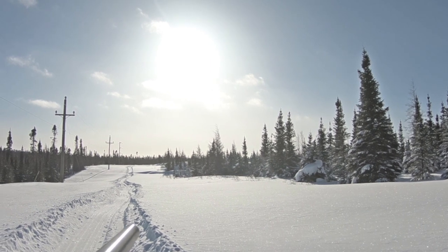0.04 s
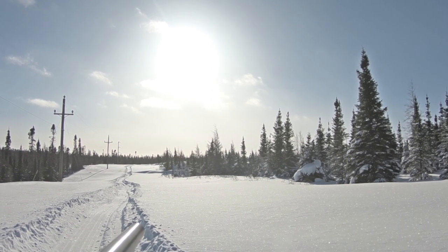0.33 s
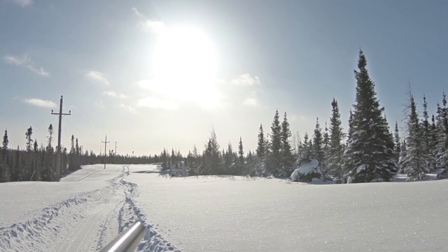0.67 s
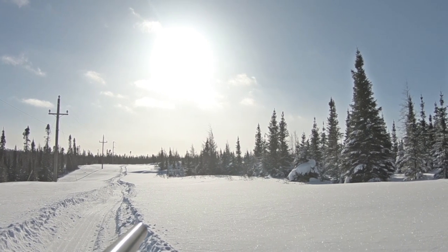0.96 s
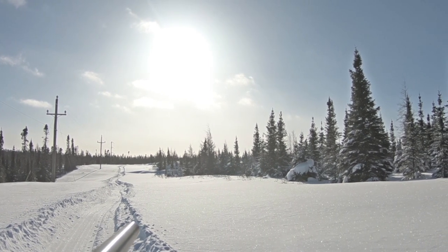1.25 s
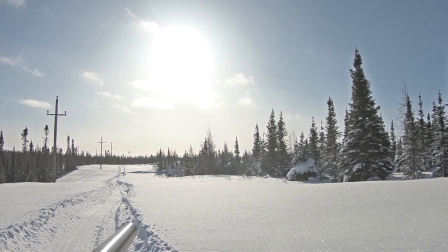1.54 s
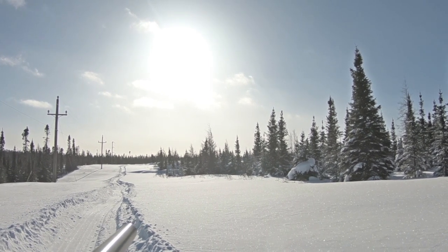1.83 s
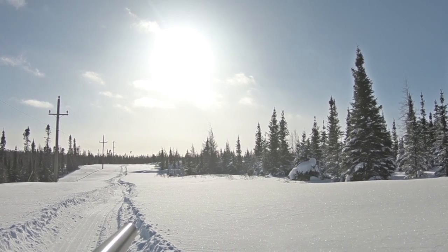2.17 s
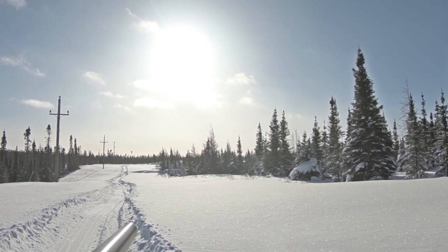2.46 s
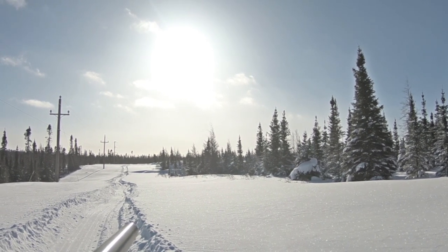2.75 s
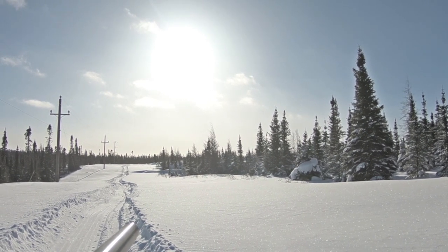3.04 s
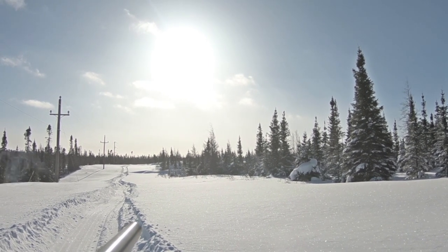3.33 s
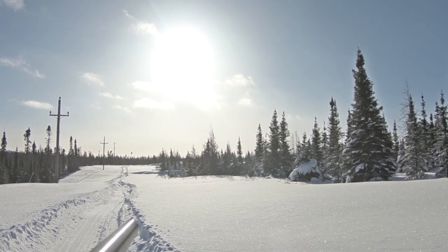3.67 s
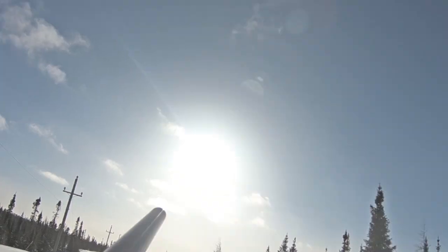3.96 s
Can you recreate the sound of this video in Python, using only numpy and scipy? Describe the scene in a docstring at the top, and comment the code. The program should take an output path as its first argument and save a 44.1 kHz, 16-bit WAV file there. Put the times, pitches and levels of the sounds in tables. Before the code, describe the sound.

One loud, close rifle shot with a crackling echo, after soft wind buffets the microphone.

```python
"""One rifle shot on an open snowfield, close to the microphone.
Air hisses faintly, a hand knocks on the stock, a sleeve rustles; growing gusts buffet the two mic ports.
At 3.3 s four growing pre-echo copies from audio processing lead into the shot: a crack on a low thump.
A deep ring dies away, most likely the camera's mount, while the spruce edge scatters the shot back
as a crackling echo. A far tree line answers last, late and dull."""
import sys
import numpy as np
from scipy.fft import rfft, irfft, next_fast_len
from scipy.io import wavfile
from scipy.ndimage import uniform_filter1d, map_coordinates

SR = 44100
rng = np.random.default_rng(int(sys.argv[2]) if len(sys.argv) > 2 else 0)


def waveform_to_disk(signal):
    """Save audio, clipped to [-1, 1], as 16-bit WAV at the path in sys.argv[1]."""
    frames = np.transpose(np.atleast_2d(signal))
    scaled = np.clip(frames, -1, 1) * 32767
    samples = np.round(scaled).astype(np.int16)
    wavfile.write(sys.argv[1], SR, samples)


N = 176400

# Table levels are relative; pan_db is left minus right.
# wind on the ports before, during and after the shot: time_s, rumble_db, flutter_db, pan_db
GUSTS = [(0.0, -70, -70.5, -2), (0.26, -68, -62, -9.5), (0.3, -65.5, -69, 1.0), (0.36, -44, -56, -10),
         (0.44, -47.5, -56.5, -1.5), (0.65, -58, -73, -5.5), (0.84, -44.5, -55.5, 4.5),
         (0.88, -56.5, -68.5, 0), (0.94, -46.5, -63.5, -8), (1.21, -64.5, -69.5, -9), (1.28, -45, -65, -17),
         (1.38, -85, -72, -6), (1.44, -51, -63.5, -15), (1.62, -69.5, -67, -8), (1.72, -40.5, -47.5, 7.5),
         (1.82, -45.5, -70, -11), (1.92, -64, -74.5, -9), (2.02, -51, -53, 12), (2.06, -73, -63, -3.5),
         (2.1, -36.5, -45, 11), (2.16, -30.5, -42.5, 8), (2.28, -60, -68, 5), (2.31, -52, -65.5, -7),
         (2.41, -42.5, -43.5, -2.5), (2.46, -34.5, -36.5, 8), (2.55, -53, -50.5, 10.5),
         (2.69, -31, -33, 16), (2.71, -42, -42, 10.5), (2.78, -41, -37.5, 16), (2.81, -51, -56.5, -5),
         (2.84, -34.5, -40.5, 10.5), (2.88, -44.5, -50.5, 4), (2.91, -35.5, -33.5, 17),
         (3.0, -44.5, -36.5, 13.5), (3.2, -30, -36, 13), (3.26, -46, -33.5, 10.5)]
LULL = [(3.3, -37, -47, 9), (3.38, -67.5, -64, -11), (3.652, -61, -70, -20)]
LATE_GUSTS = [(3.69, -42.5, -51, 4.5), (3.816, -43, -46, -1.5), (3.84, -36, -68, 1.5),
              (3.886, -71, -53, -6), (3.928, -62, -45.5, -9), (4.0, -47, -55, 0)]
# sharpest buffets: start_s, level_db
BUFFETS = [(2.105, -46), (2.461, -26.5), (2.663, -31.5), (2.686, -37), (2.744, -33), (2.915, -30),
           (2.971, -34), (3.015, -31), (3.082, -31), (3.125, -28.5), (3.188, -20.5), (3.238, -36)]
# air and wind spectra: freq_hz, gain_db
AIR_SPECTRUM = [(180, -23.5), (300, 0), (565, -14.5), (725, -5.5), (856, -8), (1060, -16), (2000, -19.5),
                (4440, -22.5), (7080, -21.5), (9000, -31.5), (11500, -35.5), (13000, -51), (16000, -57)]
RUMBLE_SPECTRUM = [(12, -36.5), (22, -3.5), (42, -9.5), (60, 7), (80, 0), (110, -12), (170, -35),
                   (300, -82.5), (800, -120)]
FLUTTER_SPECTRUM = [(55, -27.5), (105, 4), (170, 0), (250, -10), (320, -20), (480, -44), (800, -68),
                    (1600, -68), (3000, -78), (8000, -120)]
BUFFET_SPECTRUM = [(50, -19), (130, 1.5), (250, -1.5), (350, -13), (500, -29.5), (900, -48.5), (2500, -50),
                   (8000, -100)]

# sleeve strokes: centre_s, level_db
RUSTLES = [(1.47, -80), (1.87, -79), (2.16, -80.5), (2.835, -76)]
# sleeve and stock spectra: freq_hz, gain_db
CLOTH_SPECTRUM = [(2000, -29.5), (4500, 1.5), (7000, 1.5), (9000, -16), (14000, -46.5)]
KNOCK_SPECTRUM = [(60, -23), (220, 4), (350, -2), (520, -18), (900, -33), (3000, -70), (8000, -110)]

# echoes off single trunks: start_s, level_db, pan_db
ECHOES = [(3.39, -54, -6), (3.4301, -43.5, -27), (3.4515, -35, -1), (3.495, -45.5, -15), (3.512, -35.5, 1),
          (3.5369, -28.5, -2.5), (3.5608, -37.5, -5), (3.6309, -27.5, 2.5), (3.6615, -34.5, 1),
          (3.705, -42, -2), (3.7287, -38.5, -1), (3.8688, -41.5, -1)]
# echo envelopes of the near wood and far tree line: time_s, level_db
WASH_LEVEL = [(3.33, -57.5), (3.375, -88), (3.42, -67), (3.49, -60.5), (3.55, -54), (3.61, -57),
              (3.66, -55), (3.74, -61.5), (3.83, -67.5), (3.9, -67.5), (3.935, -62), (4, -65)]
FAR_LEVEL = [(3.87, -100), (3.925, -55.5), (4, -59.5)]
# near and far echo spectra: freq_hz, gain_db
FOREST_SPECTRUM = [(290, -49), (500, -20), (1640, -0.5), (2730, 0), (4210, -4.5), (5020, -8), (7530, -8),
                   (9360, -26.5), (12900, -32), (16000, -57)]
FAR_SPECTRUM = [(120, -2.5), (300, 5), (450, -8.5), (900, -19), (2000, -26), (6000, -33), (12000, -60)]
# left-right likeness of the wash: freq_hz, correlation
WASH_CORRELATION = [(500, 0.25), (2400, 1), (6000, 1), (12000, 0.32)]

# deep ring of the mount, midrange ring of the thump: pitch_hz, level_db, t60_s
MOUNT_MODES = [(58.83, -12, 0.9), (52.9, -13.5, 0.095), (126, -45, 0.43), (300, -27.5, 0.097)]
THUMP_BODY_MODES = [(713, -25.5, 0.03), (825, -33, 0.015), (1280, -33, 0.01)]

# four pre-echo copies, then the shot: crack_db, thump_db, thump_rise_s
PULSES = [(-41, -35.5, 0.0024), (-24.5, -18, 0.0021), (-9.5, -10.5, 0.0028), (-5.5, -6.5, 0.00059),
          (0.5, -0.5, 0.0003)]
# shock, trailing sizzle and muzzle gas spectra: freq_hz, gain_db
CRACK_SPECTRUM = [(200, 19.5), (900, 7), (1500, -18), (2100, 8), (3600, 12.5), (4550, 7), (5000, 3.5),
                  (5450, 6.5), (6700, 11.5), (7600, -7.5), (9500, -9), (12000, -35), (15000, -27),
                  (16500, -47)]
SIZZLE_SPECTRUM = [(400, -18), (1300, 6.5), (4000, 1), (7000, 0), (10000, -13), (13000, -31), (16000, -41)]
GAS_SPECTRUM = [(150, -13), (450, -11), (600, -14), (760, 3), (1080, -16), (1300, 2), (2000, -7),
                (4000, -26), (7000, -22), (10000, -35), (16000, -56)]
# thump at the left port against the right: freq_hz, gain_db
LEFT_PORT = [(100, -16.5), (320, -12), (430, -15.5), (720, 0), (1200, 2.5)]

SHOT_S = 3.3136  # start of the shot's thump
THUMP_GAP_S, CRACK_GAP_S = 0.0097, 0.010667  # pre-echo spacing
TIME_S = np.arange(N) / SR


def amp(db):
    """Decibels to gain."""
    return 10 ** (np.asarray(db) / 20)


def unit(x):
    """x at rms 1."""
    return x / np.sqrt(np.mean(x ** 2) + 1e-20)


def along(points, hz):
    """Interpolate (freq_hz, value) points on a log axis."""
    freq_hz, values = np.transpose(points)
    return np.interp(np.log(hz + 1), np.log(freq_hz + 1), values)


def curves(rows):
    """One per-sample curve for each column after time_s."""
    time_s, *columns = np.transpose(rows)
    return [np.interp(TIME_S, time_s, column) for column in columns]


def since(start_s):
    """Seconds since start_s, zero before."""
    return np.maximum(TIME_S - start_s, 0)


def fade(t, t60_s):
    """Decay of 60 dB in t60_s."""
    return np.exp(-np.log(1000) * t / t60_s)


def burst(start_s, t60_s, rise_s):
    """Envelope of a hit."""
    t = since(start_s)
    return (1 - np.exp(-t / rise_s)) * fade(t, t60_s)


def ring(start_s, modes):
    """Damped sines struck together."""
    t = since(start_s)
    return sum(amp(db) * np.sin(2 * np.pi * hz * t) * fade(t, t60_s) for hz, db, t60_s in modes)


def wobble(rate_hz):
    """Smooth random curve, rate_hz knots a second."""
    knots = rng.standard_normal(int(N * rate_hz / SR) + 4)
    return map_coordinates(knots, [TIME_S * rate_hz])


def panned(pan_db):
    """Left and right gains of mean power 1."""
    pan_db = np.atleast_1d(pan_db)
    gains = amp(np.array([pan_db, -pan_db]) / 2)
    return gains / np.sqrt(np.mean(gains ** 2, axis=0))


def filtered(x, response):
    """x through a frequency response."""
    size = next_fast_len(N + SR // 2)
    return irfft(rfft(x, size) * response(np.fft.rfftfreq(size, 1 / SR)), size)[..., :N]


def noise(spectrum, correlation):
    """Stereo noise of rms 1; correlation is a number or (freq_hz, value) points."""
    def response(hz):
        likeness = np.full_like(hz, correlation) if np.isscalar(correlation) else along(correlation, hz)
        angle = np.arccos(np.clip(likeness, -1, 1)) / 2
        return amp(along(spectrum, hz)) * np.array([np.cos(angle), np.sin(angle)])
    mid, side = filtered(rng.standard_normal((2, N)), response)
    return unit(np.array([mid + side, mid - side]))


def steadied(x, window_samples):
    """x with its slow swells divided out."""
    power = uniform_filter1d(np.mean(x ** 2, axis=0), window_samples)
    return x / np.sqrt(np.abs(power) + 1e-6)


def air(lag_s=0.00023):
    """Faint steady hiss, reaching the left port later."""
    hiss = amp(-71) * noise(AIR_SPECTRUM, correlation=0.13)
    return filtered(hiss, lambda hz: np.exp(1j * np.pi * hz * lag_s * np.array([[-1], [1]])))


def gusts():
    """Wind on the ports: a low rumble under a flapping flutter."""
    rumble_db, flutter_db, pan_db = curves([*GUSTS, *LULL, *LATE_GUSTS])
    rumble = steadied(noise(RUMBLE_SPECTRUM, correlation=0.25), window_samples=3000)
    flap_db = 4 * np.clip(wobble(rate_hz=42), -2, 1)
    flutter = unit(amp(flap_db)) * steadied(noise(FLUTTER_SPECTRUM, correlation=0.14), 2000)
    return panned(pan_db) * (amp(rumble_db + 3.5) * rumble + amp(flutter_db + 2.5) * flutter)


def buffets():
    """Short blows of wind, mostly on the left port."""
    blows = sum(amp(db - 1) * burst(start_s, t60_s=0.05, rise_s=0.012) for start_s, db in BUFFETS)
    turbulence = steadied(noise(BUFFET_SPECTRUM, correlation=0.3), window_samples=800)
    return panned(9) * blows * turbulence


def handling(rustle_width_s=0.04):
    """A hand shifts on the stock with one soft knock; a sleeve rustles."""
    hit = amp(-44) * burst(start_s=0.245, t60_s=0.057, rise_s=0.0012)
    knock = hit * noise(KNOCK_SPECTRUM, correlation=0.56)
    strokes = sum(amp(db) * np.exp(-((TIME_S - at_s) / rustle_width_s) ** 2) for at_s, db in RUSTLES)
    return knock + strokes * noise(CLOTH_SPECTRUM, correlation=0.44)


def forest():
    """Near trunks return single cracks, the wood a grainy wash, the far tree line a dull answer."""
    wash_db, = curves(WASH_LEVEL)
    far_db, = curves(FAR_LEVEL)
    grain = unit(amp(4.15 * wobble(rate_hz=450)))
    wash = amp(wash_db) * grain * noise(FOREST_SPECTRUM, WASH_CORRELATION)
    far = amp(far_db) * noise(FAR_SPECTRUM, correlation=0.53)
    returns = sum(amp(db - 5) * panned(pan_db) * burst(start_s, t60_s=0.019, rise_s=0.00077)
                  for start_s, db, pan_db in ECHOES)
    trunks = returns * steadied(noise(FOREST_SPECTRUM, correlation=0.87), window_samples=150)
    return (wash + far) * (TIME_S > SHOT_S) + trunks


def mount():
    """Recoil leaves the mount ringing, mostly on the right."""
    return amp(-3) * panned(-16.5) * ring(start_s=3.3285, modes=MOUNT_MODES)


def thump_body():
    """A brief midrange ring that gives each thump body, alike left and right."""
    return sum(amp(thump_db) * ring(SHOT_S - k * THUMP_GAP_S, THUMP_BODY_MODES)
               for k, (_, thump_db, _) in enumerate(PULSES[::-1]))


def thump(start_s, rise_s, start_hz=777, end_hz=281, sag_s=0.002, hold_s=0.0068, push_hz=165):
    """A pressure swing sagging in pitch, on a lower push."""
    t = since(start_s)
    cycles = end_hz * t + (start_hz - end_hz) * sag_s * (1 - np.exp(-t / sag_s))
    swing = amp(-1.5) * np.sin(2 * np.pi * cycles) * fade(since(start_s + hold_s), t60_s=0.032)
    push = amp(-2) * np.sin(2 * np.pi * push_hz * t) * fade(t, t60_s=0.05)
    return (1 - np.exp(-t / rise_s)) * (swing + push)


def blast():
    """Muzzle blast: a thump and its pre-echo copies, in antiphase on the ports, plus one puff of gas."""
    right = sum(amp(thump_db) * thump(SHOT_S - k * THUMP_GAP_S, rise_s)
                for k, (_, thump_db, rise_s) in enumerate(PULSES[::-1]))
    left = -filtered(right, lambda hz: amp(along(LEFT_PORT, hz)))
    gas = steadied(noise(GAS_SPECTRUM, correlation=[(800, -1.0), (2500, 0.9)]), window_samples=200)
    puff = amp(-12.5) * burst(SHOT_S, t60_s=0.008, rise_s=0.00042) * gas
    return np.array([left, right]) + puff


def crack(lag_s=0.0057, pair_gap_s=0.000298, sizzle_rise_s=0.0024):
    """The shot's shock pair and its pre-echo copies of alternating sign, each in a brief sizzle."""
    hz = np.fft.rfftfreq(N, 1 / SR)
    impulses = trails = 0
    for k, (crack_db, _, _) in enumerate(PULSES[::-1]):
        start_s = SHOT_S + lag_s - k * CRACK_GAP_S
        sign = -(-1) ** k
        impulses += sign * amp(crack_db) * np.exp(-2j * np.pi * hz * start_s)
        swell = np.exp(np.minimum(TIME_S - start_s, 0) / sizzle_rise_s)
        trails += amp(crack_db) * swell * fade(since(start_s), t60_s=0.017)
    pair = 1 + 0.45 * np.exp(-2j * np.pi * hz * pair_gap_s)
    shocks = irfft(impulses * pair * amp(along(CRACK_SPECTRUM, hz)), N)
    sizzle = amp(-24.5) * trails * noise(SIZZLE_SPECTRUM, correlation=0.2)
    return panned(2) * shocks + sizzle


def scene():
    """Wind and handling, the shot, its ring and echo."""
    background = gusts() + buffets() + air() + handling()
    return background + blast() + crack() + thump_body() + mount() + forest()


def record(dry):
    """Soft clip near full scale, then a steep low-pass."""
    cutoff_hz = 16400
    clipped = dry / (1 + np.abs(dry) ** 8) ** (1 / 8)
    return filtered(clipped, lambda hz: 1 / (1 + (hz / cutoff_hz) ** 90))


dry = scene()
out = record(dry)
waveform_to_disk(out)
```